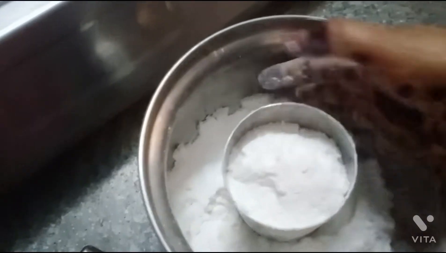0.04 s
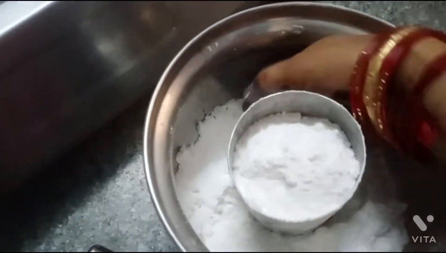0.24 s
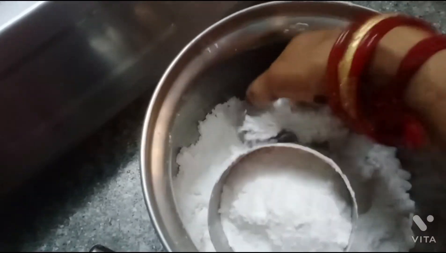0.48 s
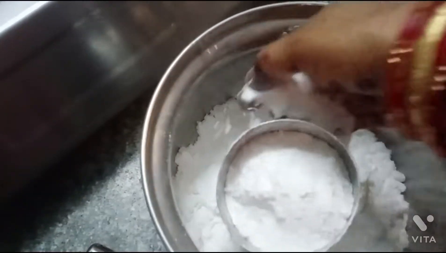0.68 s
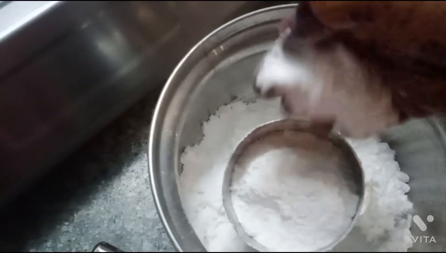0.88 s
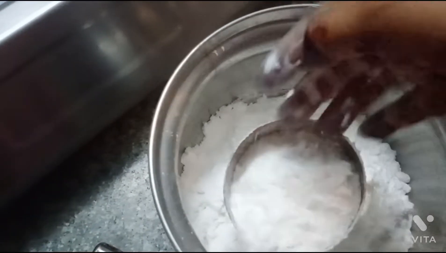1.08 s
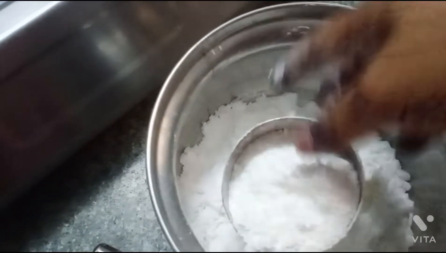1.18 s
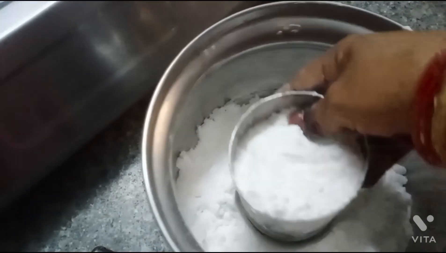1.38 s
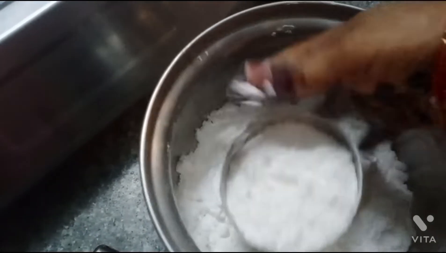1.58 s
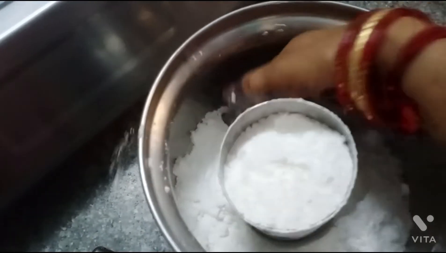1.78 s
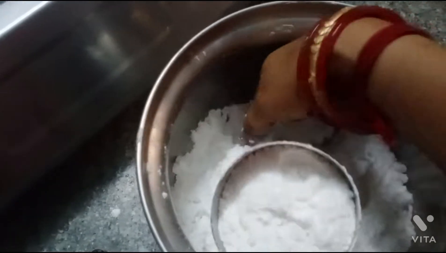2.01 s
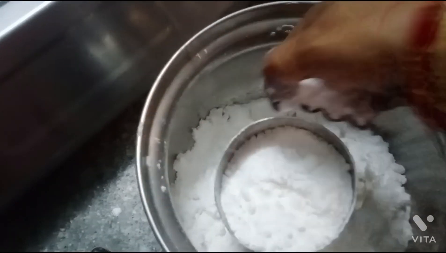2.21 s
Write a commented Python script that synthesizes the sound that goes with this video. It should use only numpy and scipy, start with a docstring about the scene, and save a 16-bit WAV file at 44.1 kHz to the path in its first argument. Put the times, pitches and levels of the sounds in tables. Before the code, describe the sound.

Bangle clinks and steel taps over a soft powdery scrape, with dull thuds on a kitchen counter

```python
"""Glass bangles clink on a hand that scoops flour in a steel bowl, close by in a hard kitchen: decaying modes.
A bowl, a tumbler and the flour-damped wall ring likewise, each with its own modes and damping.
Fingers and tumbler tap on the steel (noise bursts) and thud on the counter (noise through resonances).
Powder hisses along the wall (patchy noise). Faint brief narrow-band sounds, some tonal, and one hollow knock
(filtered noise) and a room hum lie below."""
import sys
import numpy as np
from scipy import signal
from scipy.fft import rfft, irfft, next_fast_len
from scipy.io import wavfile
from scipy.ndimage import uniform_filter1d

SR = 44100
rng = np.random.default_rng(int(sys.argv[2]) if len(sys.argv) > 2 else 0)


def transcribe(u):
    """Save the signal u as a 16-bit wav file named by the first command-line argument.

    u: samples, shape (n,) or (channels, n), limited to [-1, 1]; the rate is SR.
    q: integer samples, one column per channel.
    """
    v = np.clip(np.atleast_2d(u).T, -1, 1)
    q = np.round(v * 32767).astype(np.int16)
    wavfile.write(sys.argv[1], SR, q)


N = 99225
T = np.arange(N) / SR


def amp(db):
    """Decibel law: a level in dB becomes an amplitude ratio."""
    return 10 ** (np.asarray(db) / 20)


def unit(x):
    """Power normalisation: scale to rms 1."""
    return x / np.sqrt(np.mean(x ** 2) + 1e-20)


def along(points, hz):
    """Logarithmic pitch scale: interpolate (frequency [Hz], value) points along log frequency."""
    point_hz, value = np.transpose(points)
    return np.interp(np.log(hz + 1), np.log(point_hz + 1), value)


def filtered(x, response):
    """Linear filtering: multiply the spectrum of x by a response of frequency."""
    size = next_fast_len(N + SR // 2)
    hz = np.fft.rfftfreq(size, 1 / SR)
    return irfft(rfft(x, size) * response(hz), size)[:N]


def coloured(spectrum, source):
    """Spectral shaping: a source weighted by a level curve, then scaled to rms 1."""
    points = [(0.9, -120)] + list(spectrum)
    return unit(filtered(source, lambda hz: amp(along(points, hz))))


def peaks(table):
    """Modal superposition: sum of damped resonances with alternating sign."""
    def response(f):
        total = 0
        for k, (centre, width, db) in enumerate(table):
            resonance = 1j * f * width / (centre ** 2 - f ** 2 + 1j * f * width)
            total = total + (-1) ** k * amp(db) * resonance
        return total
    return response


def fade(start, t60, rise):
    """Exponential decay: the envelope rises from the start and falls 60 dB per t60."""
    t = np.maximum(T - start, 0)
    return (1 - np.exp(-t / rise)) * amp(-60 * t / t60)


DAMP_T60_S = 0.028  # decay of a mode once it is damped
WANDER_RAD, WANDER_PER_S = 0.3, 110  # phase unrest of a mode at 4 kHz, and its rate
SCATTER_DB = 1  # random spread of mode levels from hit to hit
UPPER_HZ = 3300  # modes above this can die away early


def ring(hits, modes, attack_s, upper_end_s=N / SR):
    """Modal synthesis: each hit excites all modes, slightly unsteady, and damps the ringing before it."""
    out = np.zeros(N)
    next_hits = [row[0] for row in hits[1:]] + [N / SR]
    for (start, hit_db, tilt_db), stop in zip(hits, next_hits):
        luck = rng.standard_normal(len(modes))
        for (hz, mode_db, t60), chance in zip(modes, luck):
            end = min(stop, upper_end_s) if hz > UPPER_HZ else stop
            damped = amp(-60 * np.maximum(T - end, 0) / DAMP_T60_S)
            unrest = np.interp(T * WANDER_PER_S, np.arange(400), rng.standard_normal(400))
            brightness_db = tilt_db * np.log2(hz / 4000)
            gain = amp(hit_db - 10 + mode_db + brightness_db + SCATTER_DB * chance)
            phase = 2 * np.pi * hz * (T - start) + WANDER_RAD * hz / 4000 * unrest
            out += gain * damped * fade(start, t60, attack_s) * np.sin(phase)
    return out


# spectrum of the room hum: (frequency [Hz], relative level [dB per Hz])
HUM_SPECTRUM = [(25, -25), (114, 1.5), (422, -13), (510, -6), (878, -16), (1250, -9.5), (1730, -14),
                (2040, -13), (15500, -45.5)]
HUM_DB = -66


def room_hum():
    """Stationary random noise: a steady spectrum fixes its colour."""
    return amp(HUM_DB) * coloured(HUM_SPECTRUM, rng.standard_normal(N))


# faint brief narrow-band sounds, some tonal, and one hollow knock:
# (start [s], length [s], frequency [Hz], width [Hz], level [dB])
FAINT_BANDS = [(0.664, 0.22, 1400, 340, -59.5), (0.95, 0.12, 511, 9.1, -58.5),
               (1.127, 0.093, 2410, 360, -64.5), (1.412, .07, 550, 220, -54.5),
               (1.488, 0.19, 1158, 290, -64), (1.514, 0.24, 2004, 106, -62),
               (1.519, 0.15, 3000, 340, -62.5)]


def faint_bands():
    """Band-pass filtered noise: the bandwidth sets how tonal each sound is; each swells and fades."""
    out = np.zeros(N)
    for start, length, hz, width, db in FAINT_BANDS:
        noise = rng.standard_normal(N)
        band = unit(filtered(noise, lambda f: 1 / (1 + ((f - hz) / width * 2) ** 4)))
        progress = np.clip((T - start) / length, 0, 1)
        swell = np.sqrt(np.sin(np.pi * progress).clip(0))
        out += amp(db) * swell * band
    return out


# reverberation time of the kitchen: (frequency [Hz], T60 [s])
ROOM_T60 = [(1000, 0.32), (14000, 0.21)]


def room(x):
    """Statistical reverberation: a noise tail in which each frequency decays at its own rate."""
    hz, t, z = signal.stft(rng.standard_normal(SR // 2), SR, nperseg=256)
    decay = amp(-60 * t / along(ROOM_T60, hz)[:, None])
    tail = signal.istft(z * decay, SR, nperseg=256)[1]
    delayed = np.pad(x, (200, 0))  # samples
    return signal.fftconvolve(delayed, tail / np.linalg.norm(tail))[:N]


# treble of contact on the steel: (frequency [Hz], relative level [dB per Hz])
STEEL_TREBLE = [(1700, -44.5), (2650, -14), (3050, -12), (5900, -4), (6900, -5.5), (7400, -15), (9000, -42)]


def steel_treble(source):
    """Spectral shaping: the treble of a contact on the steel."""
    return coloured(STEEL_TREBLE, source)


# airy top of contact on the steel: (frequency [Hz], relative level [dB per Hz])
STEEL_AIR = [(7000, -23.5), (8200, -6), (9500, -18), (11500, -17), (12200, -8), (15500, -6)]


def steel_air(source):
    """Spectral shaping: the airy top of a contact on the steel."""
    return coloured(STEEL_AIR, source)


# hiss of the sliding flour: (time [s], level [dB])
POWDER_LEVEL = [(0, -62.5), (.09, -60.5), (.3, -37), (.65, -50), (.8, -55.5), (.92, -71.5), (1.2, -80.5),
                (1.29, -67.5), (1.335, -52.5), (1.44, -45.5), (1.52, -53), (1.62, -66), (1.66, -75.5),
                (1.76, -59.5), (1.81, -59.5), (1.9, -51.5), (2.0, -64), (2.25, -73)]
GRAINS_PER_S = 1100  # mean rate
PATCH_DB = 2.2  # rms unevenness over time and frequency
POWDER_AIR_DB = -13  # airy part against the treble


def powder():
    """Granular friction: random grain impacts and patchy hiss slide on the steel."""
    impacts = rng.random(N) < GRAINS_PER_S / SR
    grains = unit(impacts * rng.standard_normal(N))
    z = signal.stft(grains + rng.standard_normal(N), nperseg=512)[2]
    over_frequency = uniform_filter1d(rng.standard_normal(z.shape), 6, 0)
    patches = unit(uniform_filter1d(over_frequency, 10, 1))
    source = signal.istft(z * amp(PATCH_DB * patches), nperseg=512)[1][:N]
    hiss = steel_treble(source) + amp(POWDER_AIR_DB) * steel_air(source)
    return amp(np.interp(T, *np.transpose(POWDER_LEVEL))) * hiss


# bowl and tumbler on the counter: (time [s], relative low level [dB], relative upper level [dB], T60 [s])
# the upper resonances shorten the T60
COUNTER_BLOWS = [(.008, -37.5, -43, 0.69), (0.234, -37, -37.5, 0.3), (0.543, -36.5, -34, 0.5),
                 (1.423, -36.5, -53.5, 0.35), (1.554, -43.5, -83, 0.36), (1.664, -37.5, -40.5, 0.39),
                 (1.814, -33.5, -24, 0.46), (1.905, -39, -39.5, 0.041), (2.064, -33.5, -35.5, 0.37),
                 (2.202, -52, -73, 0.86)]
# low, then upper resonances of the counter: (frequency [Hz], width [Hz], relative level [dB])
LOW_MODES = [(83, 36, -9.5), (124.3, 68, -4.5), (153.6, 38.7, -1.5)]
UPPER_MODES = [(224, 29, -7.5), (292, 22, -1), (426.5, 120, -14), (601, 100, -14.5)]
UPPER_T60_RATIO = 0.47
SHUDDER_RISE_S, SHUDDER_DB = 0.0095, 26
PUSH_S, PUSH_DB = 0.0015, 18.5  # the low push; the upper one is shorter by the T60 ratio


def thuds():
    """Forced resonance: a push and a noisy shudder drive the counter; its upper modes die sooner."""
    out = np.zeros(N)
    for column, modes, life in ((1, LOW_MODES, 1), (2, UPPER_MODES, UPPER_T60_RATIO)):
        push, shudder = np.zeros(N), np.zeros(N)
        for row in COUNTER_BLOWS:
            start, db, t60 = row[0], row[column], row[3]
            shudder += amp(db + SHUDDER_DB) * fade(start, life * t60, SHUDDER_RISE_S)
            push += amp(db + PUSH_DB) * np.exp(-((T - start) / (life * PUSH_S) - 2) ** 2)
        force = push + shudder * rng.standard_normal(N)
        out += filtered(force, lambda f: peaks(modes)(f) / (1 + 1j * f / 1200) ** 2)
    return out


# dry contacts: (time [s], relative treble level [dB], relative level above 8 kHz [dB], relative mid level [dB])
CONTACTS = [(.0036, -37, -64, -66), (0.1026, -22, -32, -54), (0.2042, -8.5, -16, -29.5),
            (0.2601, -10.5, -21, -31.5), (0.541, -16.5, -25.5, -31), (1.573, -56, -46.5, -89),
            (1.674, -41, -44.5, -70), (1.727, -63, -41, -70), (1.817, -23.5, -31, -40),
            (1.8932, -36, -51.5, -54.5), (1.9338, -23.5, -34.5, -40.5)]
# hollow mid knock: (frequency [Hz], width [Hz], relative level [dB])
MID_MODES = [(549, 157, 0), (855, 310, 3), (1127, 440, 0)]
CLICK_T60_S, CLICK_RISE_S = 0.012, 1e-4
SKID_T60_S, SKID_RISE_S, SKID_DB = 0.16, 0.0055, -4  # level against the click


def taps():
    """Impact and friction: a noise click and a short skid, with a resonant hollow mid knock."""
    shapes = []
    for start, *_ in CONTACTS:
        click = fade(start, CLICK_T60_S, CLICK_RISE_S)
        skid = amp(SKID_DB) * fade(start, SKID_T60_S, SKID_RISE_S)
        shapes.append(click + skid)
    band_db = np.array(CONTACTS)[:, 1:].T + [[-6], [-6], [20]]  # treble, air, mid
    treble, air, mid = amp(band_db) @ np.array(shapes)
    noise = rng.standard_normal((3, N))
    knock = filtered(mid * noise[2], lambda f: peaks(MID_MODES)(f) / (1 + 1j * f / 2000) ** 2)
    return treble * steel_treble(noise[0]) + air * steel_air(noise[1]) + knock


KNOCK_ATTACK_S = 0.0018  # for wall and tumbler
# a bangle knocks the bowl's wall: (time [s], relative level [dB], brightness [dB per octave])
WALL_KNOCKS = [(.5422, -1, 1.5)]
# modes of the flour-damped wall: (frequency [Hz], relative level [dB], T60 [s])
WALL_MODES = [(874, -3.5, 0.02), (4020, -11, 0.023), (5870, 4.5, 0.014)]


def wall_knock():
    """Damped modes: flour on the steel wall makes a bangle's knock die at once."""
    return ring(WALL_KNOCKS, WALL_MODES, KNOCK_ATTACK_S)


# one bangle meets the tumbler: (time [s], relative level [dB], brightness [dB per octave])
TUMBLER_CHINKS = [(1.9314, -4, 5.5)]
# modes of the tumbler: (frequency [Hz], relative level [dB], T60 [s])
TUMBLER_MODES = [(2310, -4.5, 0.032), (2536, -11, 0.033), (3730, -8.5, 0.033), (3893, 4.5, 0.024),
                 (5017, -1, 0.041), (5260, -18.5, 0.047), (6010, 1, 0.014), (6760, -7.5, 0.035),
                 (6720, -6.5, 0.017)]


def tumbler_chink():
    """Damped modes: the tumbler rings only briefly when a bangle strikes it."""
    return ring(TUMBLER_CHINKS, TUMBLER_MODES, KNOCK_ATTACK_S)


# the bowl is set ringing: (time [s], relative level [dB], brightness [dB per octave])
BOWL_STARTS = [(.262, -20.5, -0.5)]
# modes of the bowl: (frequency [Hz], relative level [dB], T60 [s])
BOWL_MODES = [(1233, -1, .55), (1243, -17, 2.6), (2045, -8, 1.5), (2926, -10, .8), (3765, 1, 1),
              (4784, 11, .4)]
BOWL_SWELL_S, UPPER_END_S = 0.036, 0.476  # rise constant; time when the upper modes start to die away


def bowl_ring():
    """Modal vibration: the bowl's modes swell and ring; the upper modes of the bowl die away early."""
    return ring(BOWL_STARTS, BOWL_MODES, BOWL_SWELL_S, UPPER_END_S)


# bangle clinks: (time [s], relative level [dB], brightness [dB per octave])
BANGLE_CLINKS = [(.2022, -5.5, 2), (.222, -8, -1), (.2592, -8.5, -1), (.277, -8, -8), (.345, -22, -4),
                 (.404, -24.5, -6.5)]
# modes of the glass bangles: (frequency [Hz], relative level [dB], T60 [s])
BANGLE_MODES = [(2232, -16, 0.28), (3382, -7, 0.067), (3686, -12, .25), (3943, 0.5, 0.17), (4225, -6, 0.33),
                (5015, -8, .25), (5227, -10, .2), (5895, -5, 0.33), (6235, -8, 0.2), (6445, -9, 0.25),
                (6930, -6, 0.2), (8335, -22, 0.15)]


def bangle_clinks():
    """Impact excitation: a very sharp blow sets the many modes of the glass rings sounding."""
    return ring(BANGLE_CLINKS, BANGLE_MODES, attack_s=0.00021)


def scene():
    """Superposition: the direct sounds add to the room's answer, thuds, powder, faint bands and hum."""
    long_rings = bangle_clinks() + bowl_ring()
    short_contacts = tumbler_chink() + wall_knock() + taps()
    reverberant = room(amp(-13) * long_rings + amp(-6) * short_contacts)  # sends in dB
    direct = long_rings + short_contacts
    return (direct + reverberant + thuds() + powder() + faint_bands() + room_hum())[None]


TOP_HZ = 15900


def record(dry):
    """Band limitation: the phone keeps nothing at or above its top frequency."""
    return filtered(dry[0], lambda hz: hz < TOP_HZ)[None]


dry = scene()
out = record(dry)
transcribe(out)
```